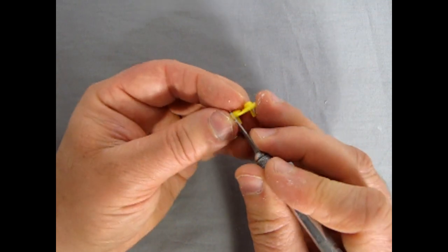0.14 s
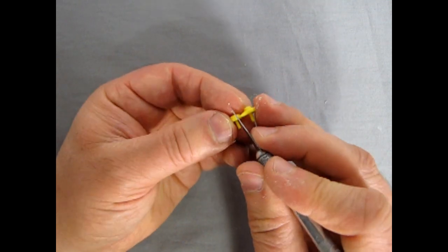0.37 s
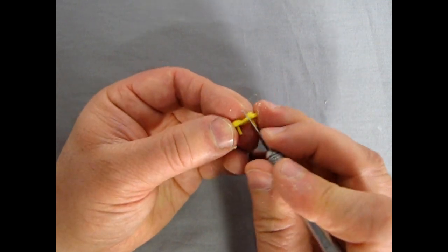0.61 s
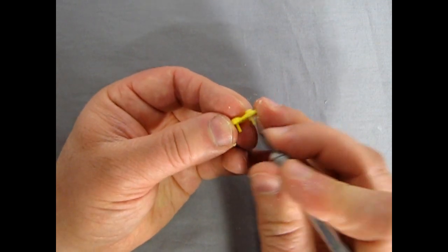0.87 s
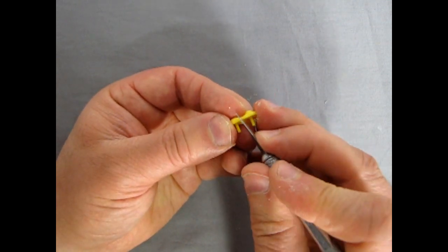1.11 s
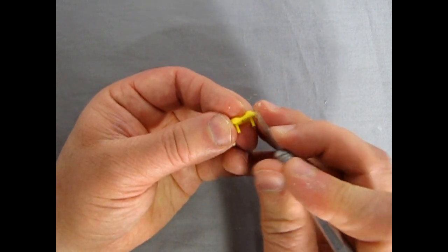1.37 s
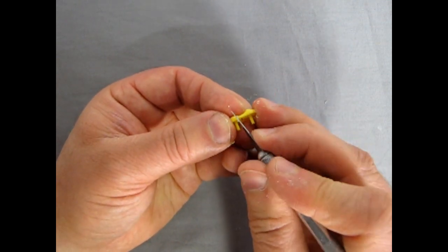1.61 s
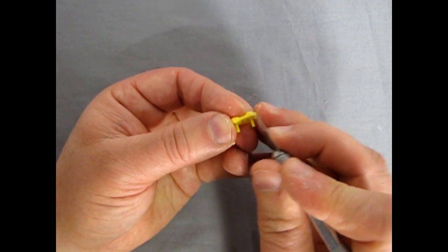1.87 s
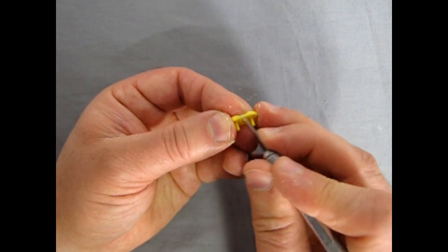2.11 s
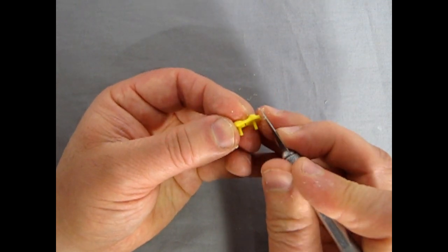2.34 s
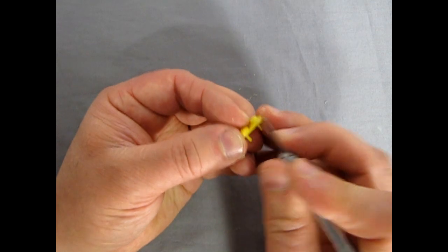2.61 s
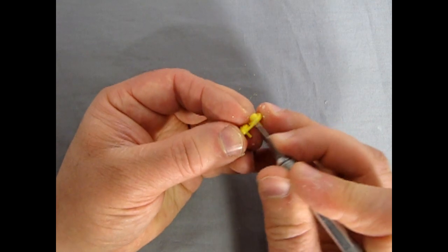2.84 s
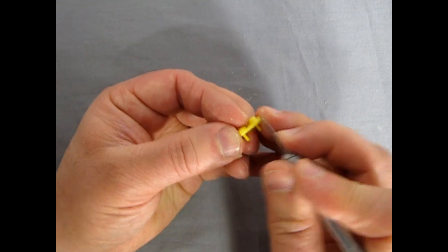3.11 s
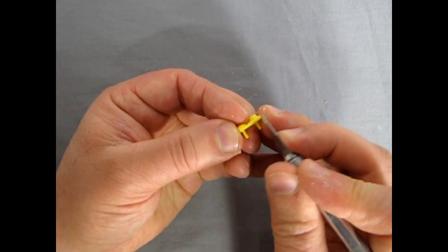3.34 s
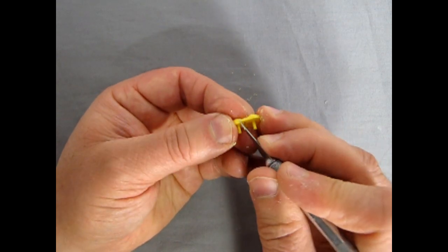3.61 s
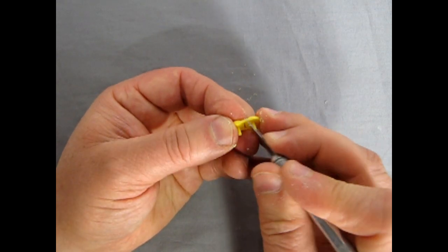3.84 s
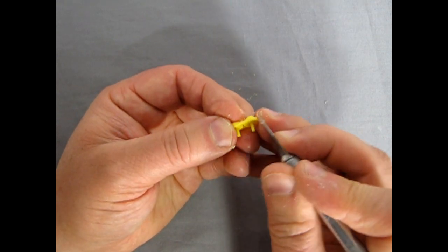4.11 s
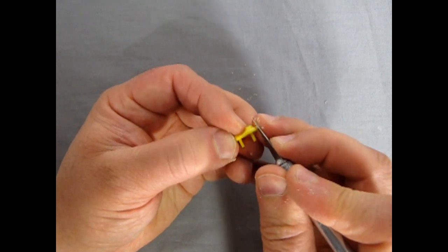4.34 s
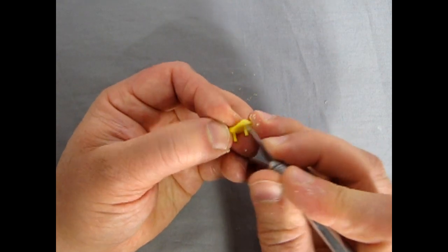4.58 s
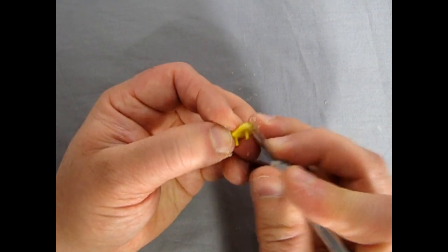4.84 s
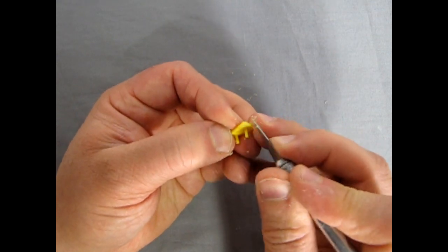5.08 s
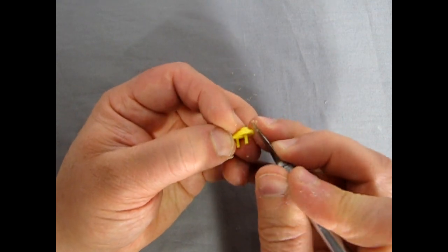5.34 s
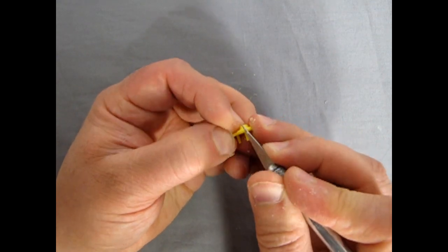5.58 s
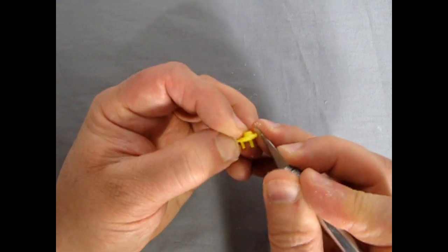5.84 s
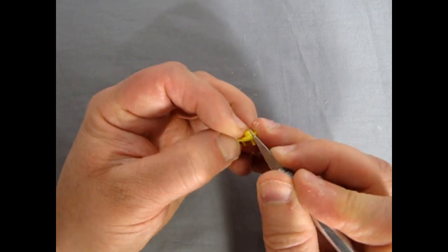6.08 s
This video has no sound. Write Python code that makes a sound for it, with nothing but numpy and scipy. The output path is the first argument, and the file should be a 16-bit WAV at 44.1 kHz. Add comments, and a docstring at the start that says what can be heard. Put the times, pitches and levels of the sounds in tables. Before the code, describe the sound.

A hobby knife shaves a tiny plastic part in short irregular ticking scrapes, one nick especially hard, amid light handling thumps and quiet room hiss.

```python
"""Over a faint room hum and a small motor's distant purr, fingers rustle and a wrist thumps the bench.
From 0.6 s a hobby knife shaves flash off a small plastic part in fifteen short strokes, heard close up.
Each stroke is a spray of tiny random slips with a few sharp nicks, ringing the modes of blade and part,
and the bench mirrors it about a millisecond late. Between and during strokes come more rustles and thumps.
A very hard pair of nicks opens the stroke at 4.93 s; the last stroke runs up to the end."""
import sys
import numpy as np
from scipy import signal
from scipy.fft import rfft, irfft, next_fast_len
from scipy.io import wavfile
from scipy.ndimage import uniform_filter1d

SR = 44100
rng = np.random.default_rng(int(sys.argv[2]) if len(sys.argv) > 2 else 0)


def put_to_file(sound):
    """Save the sound as 16-bit audio at rate SR, in the file named by the first command-line argument."""
    columns = np.atleast_2d(sound).T  # one column per channel
    safe = np.clip(columns, -1, 1)
    whole_steps = np.round(safe * 32767)
    wavfile.write(sys.argv[1], SR, whole_steps.astype(np.int16))


def nominal_scale(level):
    """Amplitude ratio for a level in decibels (scalar or array-like)."""
    x = np.asarray(level, float) / 20
    return 10 ** x


N = 273552

# Effort on the blade, one short curve a stroke. Each point: time in seconds, scraping drive in dB.
STROKES = [
    [(0.606, -56), (0.613, -43), (0.641, -37), (0.652, -45), (0.664, -44), (0.684, -49), (0.689, -62)],
    [(0.725, -37), (0.742, -34), (0.747, -46), (0.768, -62)],
    [(1.204, -41), (1.222, -39), (1.243, -43), (1.27, -39.5), (1.28, -60)],
    [(1.723, -37), (1.731, -45), (1.741, -35), (1.781, -41), (1.787, -58)],
    [(2.048, -56), (2.056, -50), (2.068, -68)],
    [(2.18, -51), (2.199, -53), (2.203, -38), (2.215, -50), (2.25, -50), (2.275, -44), (2.28, -60)],
    [(2.67, -55), (2.683, -53), (2.692, -35), (2.701, -40), (2.707, -57)],
    [(3.14, -48), (3.156, -48), (3.166, -34.5), (3.183, -31.5), (3.194, -43), (3.21, -56)],
    [(3.829, -41), (3.842, -47), (3.853, -35), (3.861, -42), (3.874, -42), (3.895, -52), (3.9, -62)],
    [(3.932, -45), (3.939, -42), (3.946, -33), (3.962, -36), (3.972, -27.5), (3.982, -44), (3.995, -59)],
    [(4.368, -55), (4.401, -46), (4.412, -55), (4.437, -60)],
    [(4.93, -27), (4.937, -25), (4.943, -37), (4.948, -51), (4.978, -62)],
    [(5.309, -55), (5.323, -42), (5.336, -37), (5.342, -58)],
    [(5.724, -49), (5.736, -46), (5.752, -38), (5.758, -54), (5.772, -62)],
    [(6.177, -49), (6.188, -53), (6.2, -42)],
]
# How each stroke is held. Each row: brightness in dB per octave, low ring, blade ring and part ring in dB.
GRIPS = [(-3.5, 1, -2, 5), (5, 9, -3, 1), (2, 7, 0, -0.5), (3, 5, -1, 0), (-6, -2, -2, 0), (3, 5, -2.5, 1),
         (5, 6, -1, 1), (8, 1, 0, 1.5), (0, 1.5, 0, -1), (6.5, 3.5, 1, -1), (6, 5, -4, 2),
         (6.5, 2.5, -2.5, 1.5), (7.5, 6, -5, 2.5), (4, 5, -4, 2), (-1, 2, -2, 3)]


def amp_pair(db, pan_db):
    """Gains for left and right; pan_db is left against right."""
    return nominal_scale(db + np.multiply.outer([.5, -.5], pan_db))


def evened(x):
    """Scales to rms 1."""
    return x / np.sqrt(np.mean(x ** 2) + 1e-20)


def read(points, hz):
    """Reads a curve over frequency, straight between points on a log-frequency axis."""
    f, value = np.transpose(points)
    return np.interp(np.log(hz + 1), np.log(f + 1), value)


def resonate(x, hz, width_hz):
    """A two-pole resonance of gain 1 at its peak."""
    return signal.lfilter(*signal.iirpeak(hz, hz / width_hz, SR), x)


def delayed(x, ms):
    """Delays by any fraction of a sample: one value, or a table over frequency."""
    size = next_fast_len(N + 512)
    hz = np.fft.rfftfreq(size, 1 / SR)
    ms = read(ms, hz) if np.ndim(ms) else ms
    turned = rfft(x, size) * np.exp(-2j * np.pi * hz * ms / 1000)
    return irfft(turned, size)[..., :N]


def noise(spectrum, patchy_db, size):
    """Stereo noise of rms 1 from random short-time spectra with drifting louder and softer patches."""
    # Left-right likeness. Each row: frequency in Hz, likeness from 0 to 1.
    likeness = [(30, 0.7), (100, 0.75), (300, 0.64), (1000, 0.29), (3000, 0.27), (8000, 0.04)]
    # Stereo balance. Each row: frequency in Hz, left against right in dB.
    lean = [(30, -9), (100, -1), (400, -1.5), (8000, -0.5)]
    frames, hz = N // (size // 4) + 5, np.fft.rfftfreq(size, 1 / SR)
    a, b, c, d, patches = rng.standard_normal((frames, len(hz), 5)).T
    patches = uniform_filter1d(patches, size=10, axis=0)
    patches = evened(uniform_filter1d(patches, size=10, axis=1))
    same = np.clip(read(likeness, hz), -1, 1)[:, None]
    left, other = a + 1j * b, c + 1j * d
    z = np.array([left, same * left + np.sqrt(1 - same ** 2) * other])
    z *= amp_pair(read(spectrum, hz), read(lean, hz))[:, :, None]
    z *= nominal_scale(patchy_db * patches)
    return evened(signal.istft(z, nperseg=size, noverlap=size - size // 4)[1][:, :N])


def knife():
    """Slips under each stroke and single nicks ring the same body; grip and effort shade its modes."""
    gain, shading = strokes()
    chatter_db = 1.2 * evened(resonate(rng.standard_normal(N), 260, 160))  # the edge judders along the seam
    scrape = gain * nominal_scale(chatter_db) * slips(5000, 2.4)
    drive = scrape + nicks(shading)
    # Fine shavings scatter as a high fizz
    fizz_gain = gain * nominal_scale(shading[0] + chatter_db - 22)
    fizz = fizz_gain * resonate(rng.standard_normal((2, N)), 12000, 7000)
    return blade_and_part(drive, shading) + fizz


def strokes():
    """Scraping gain over time, and how effort, grip and the sinking edge colour the ring."""
    bright_db_per_db, low_db_per_db = 0.4, -0.3  # more effort is brighter; a light touch keeps more low ring
    sink_db, sharpen_db = 4, 5  # low ring and brightness grow over a stroke as the edge sinks in
    t, gain = np.arange(N) / SR, np.zeros(N)
    shading = np.zeros((4, N))
    bright_db, low_db, blade_db, part_db = shading
    for rows, (bright, low, blade, part) in zip(STROKES, GRIPS):
        s, db = np.transpose(rows)
        on = slice(round(s[0] * SR) - SR // 50, round(s[-1] * SR))  # the colour is set 20 ms ahead
        effort_db = np.interp(t[on], s, db)
        gain[on] = nominal_scale(effort_db) * (t[on] > s[0])
        below_peak_db = effort_db - db.max()
        sink = np.interp(t[on], s[[0, -1]], [-.5, .5])
        bright_db[on] = bright + bright_db_per_db * below_peak_db + sharpen_db * sink
        low_db[on] = low + low_db_per_db * below_peak_db + sink_db * sink
        blade_db[on], part_db[on] = blade, part
    return gain, shading


def slips(per_s, spread_db):
    """Random stick-slip clicks, a few of them large, at rms 1."""
    size = nominal_scale(spread_db * np.minimum(rng.exponential(1, N), 4)) * rng.standard_normal(N)
    return evened(size * (rng.random(N) < per_s / SR))


def nicks(shading):
    """The blade catches and snaps free: a click, then splinters for 3 ms; each sets its own colour."""
    # Each row: time in seconds, drive in dB, brightness in dB per octave.
    snaps = [(0.608, -42, 0), (0.6143, -32, 0.5), (0.6265, -31, -4), (0.64, -28, -2), (0.6452, -31, -1.5),
             (0.6713, -36, -6), (0.6816, -33, -4), (0.7252, -23.5, 2), (0.7415, -24.5, 9), (1.2042, -31, 2),
             (1.2133, -33, -2), (1.2242, -33, -4), (1.7219, -20, 2), (1.7368, -31, 0), (1.7427, -28, -1),
             (1.7575, -31, 5), (1.798, -46, -3), (2.05, -43, -10), (2.054, -44, -8), (2.1805, -39, 2),
             (2.2005, -31, 0), (2.2443, -39, -1), (2.272, -39, 7), (2.6929, -29, 2), (3.1406, -39, 0),
             (3.1752, -28, 7), (3.182, -29, 9), (3.8296, -31, 0), (3.834, -32, 0), (3.8385, -33, -4),
             (3.8477, -26, 5), (3.853, -20.5, 4), (3.884, -36.5, 5), (3.9335, -30, 4), (3.9441, -26, 2),
             (3.9685, -21, 2), (4.1985, -48, -10), (4.294, -50, -4), (4.3373, -41.5, 3), (4.3926, -39, -2),
             (4.9297, -16.5, 6), (4.9338, -19, 7), (5.0069, -47.5, -8), (5.3292, -31, 1.5),
             (5.3352, -29, -2), (5.7267, -40.5, 6), (5.7495, -30, 0), (6.1784, -35, -2)]
    low_offset_db, scatter_db = -5, 2  # low ring against its stroke's grip, and its chance spread
    out = np.zeros(N)
    low_scatter_db = scatter_db * rng.standard_normal(len(snaps))
    crack = rng.standard_normal((len(snaps), 128))
    crack[:, 0] = 2.6  # the snap itself
    fade = nominal_scale(-60 * np.arange(128) / SR / .011)
    crack *= fade
    crack *= np.linalg.norm(fade) / np.linalg.norm(crack, axis=1, keepdims=True)
    # A nick takes the grip of its stroke up to 0.1 s after the stroke ends, then that of the next
    grip_at = np.searchsorted([rows[-1][0] + .1 for rows in STROKES], [row[0] for row in snaps])
    for (s, db, bright), burst, scatter, k in zip(snaps, crack, low_scatter_db, grip_at):
        on = slice(round(s * SR), round(s * SR) + 128)
        out[on] += nominal_scale(db) * burst
        shading[0, on] = bright
        shading[1, on] = GRIPS[k][1] + low_offset_db + scatter
    return out


def blade_and_part(drive, shading):
    """The ringing modes of blade and part, each driven by the cut with its own moving gain."""
    # Each row: frequency in Hz, width in Hz, level in dB, left against right in dB.
    modes = [(239.4, 36, -19, 0.5), (434, 30, -25.5, -2), (855, 126, -20, -3), (1028, 240, -12.5, -1.5),
             (1384, 73, -4, -2.5), (1945, 113, -12, -2.5), (2237, 67, -11, -7.5), (2600, 1650, -21.5, -6.5),
             (2734, 410, -12, -9), (3416, 390, -13.5, -4.5), (4103, 665, -3.5, -1), (4390, 510, -0.5, 1),
             (4700, 206, 3.5, -1.5), (5010, 265, -4.5, -0.5), (5590, 166, -9.5, -11), (6406, 350, -9, 3),
             (7500, 410, -12, -6), (8635, 194, -10, -4.5), (9400, 480, -13.5, 2.5),
             (11500, 4500, -25.5, -4), (14500, 830, -27.5, -2.5)]
    bright_db, low_db, blade_db, part_db = shading
    out, power = 0, 0
    for k, (hz, width_hz, db, pan) in enumerate(modes):
        if hz <= 700:
            tilt_db = 4  # the cut pushes a dull thud into the hand
        else:
            if hz > 4500:
                tilt_db = bright_db * min(np.log2(hz / 4500), 1.25)
            else:
                tilt_db = low_db * min(np.log2(4500 / hz) / 2, 1)  # in full from two octaves down
            tilt_db = tilt_db + blade_db * (4200 < hz < 5200) + part_db * (1700 < hz < 3300)
        ring = resonate(drive * nominal_scale(tilt_db), hz, width_hz)
        out += (-1) ** k * amp_pair(db, pan)[:, None] * ring  # neighbours in opposite polarity
        power += nominal_scale(db) ** 2 * width_hz * np.pi / SR
    return out / np.sqrt(power)


def room(x, t60=0.069):
    """A short scattered tail (t60 in s), other taps for each side."""
    t = np.arange(SR // 4) / SR
    tail = rng.standard_normal((2, len(t))) * nominal_scale(-60 * t / t60) * (t > .0015)
    return signal.fftconvolve(x, tail / np.linalg.norm(tail[0]), axes=1)[:, :N]


def thumps():
    """Hands knock the bench: a low ring swells in a few ms and dies fast, with a duller knock of wood on top."""
    # Each row: start in seconds, level in dB, pitch in Hz, 60 dB decay in seconds (20 ms at least).
    knocks = [(0.33, -55, 68.6, 0.16), (0.638, -56, 148, 0.093), (0.8, -55, 60, 0.25),
              (1.749, -52.5, 67.3, 0.09), (1.844, -48, 52.3, 0.078), (2.053, -43.5, 70.0, 0.034),
              (2.277, -39.5, 69.6, 0.13), (2.702, -42, 59.2, 0.13), (3.015, -50.5, 58, 0.2),
              (3.162, -53, 220, 0.07), (3.168, -42, 74.4, 0.047), (3.87, -51.5, 92, 0.26),
              (3.958, -41.5, 54.4, 0.088), (4.943, -46, 126, 0.091), (4.945, -50, 250, 0.07),
              (4.97, -53, 54.4, 0.15), (5.4, -54, 55, 0.25), (5.745, -50, 260, 0.08),
              (5.749, -50, 75, 0.15), (6.119, -54, 67.3, 0.1), (6.178, -52, 240, 0.08)]
    knock_db, knock_db_per_octave = -16, 8  # wood against the low ring at 65 Hz; higher thumps knock more
    t, out = np.arange(SR // 2) / SR, np.zeros(N + SR)
    wood = resonate(rng.standard_normal((len(knocks), len(t))), 175, 158)
    for (s, db, hz, t60), grain in zip(knocks, wood):
        swell = nominal_scale(-60 * t / max(t60, .02)) * (1 - np.exp(-t / 0.0048))
        wood_gain = nominal_scale(knock_db + knock_db_per_octave * np.log2(hz / 65))
        ring = np.sin(2 * np.pi * hz * t) + wood_gain * evened(grain)
        out[round(s * SR):][:len(t)] += nominal_scale(db) * swell / swell.max() * ring
    return amp_pair(0, -4.5)[:, None] * out[:N]


def rustle():
    """Soft skin friction: each shift of the fingers and each slide after a stroke swells and fades."""
    # Colour of the friction. Each row: frequency in Hz, density in dB per Hz.
    rub = [(150, -28), (310, 2.5), (420, -6.5), (600, -10.5), (1700, -2.5), (2300, -7), (2900, 0.5),
           (3600, -4.5), (5000, -6), (7000, -10), (9000, -18), (16000, -29)]
    # Fingers shift their hold. Each row: loudest at in seconds, level in dB, rise and fall in seconds per 20 dB.
    shifts = [(0.001, -59, 0.1, 0.2), (0.15, -59, 0.08, 0.3), (0.25, -56, 0.3, 0.4),
              (0.36, -61.5, 0.3, 0.4), (0.55, -67, 0.3, 0.4), (1.0, -67, 0.3, 0.05), (1.31, -64, 0.1, 0.05),
              (1.81, -66, 0.1, 0.1), (3.23, -64, 0.1, 0.06), (4.425, -63, 0.3, 0.05),
              (1.51, -69, 0.2, 0.08), (2.03, -74, 0.2, 0.15), (2.49, -71, 0.1, 0.3),
              (2.66, -66, 0.07, 0.15), (2.92, -72, 0.25, 0.08), (3.5, -70, 0.1, 0.04),
              (4.2, -64, 0.04, 0.03), (4.65, -73, 0.15, 0.15), (4.86, -71, 0.2, 0.2),
              (5.22, -70, 0.3, 0.07), (5.02, -65, 0.2, 0.08), (5.59, -65, 0.08, 0.2), (5.71, -66, 0.2, 0.3),
              (5.85, -68, 0.2, 0.05), (5.96, -68, 0.06, 0.6), (6.16, -63, 0.1, 0.2)]
    # The thumb slides on, loudest 15 ms after each stroke
    slides = [(rows[-1][0] + 0.015, -65, 0.15, 0.07) for rows in STROKES]
    t, power = np.arange(N) / SR, nominal_scale(-84) ** 2  # hands at rest
    for s, db, rise, fall in shifts + slides:
        power = power + nominal_scale(db - 20 * np.maximum((s - t) / rise, (t - s) / fall)) ** 2
    return np.sqrt(power) * noise(rub, 2.55, size=256)


def motor():
    """A small distant motor: uneven soft pulses, each ringing one part of its housing for a few ms."""
    # One row: typical pulses per second, list of housing modes in Hz, their width in Hz, level in dB.
    purr = (60, [1197, 1233, 1268, 1357], 135, -69.5)
    per_s, housing, width_hz, db = purr
    wander_db = 3.5 * evened(uniform_filter1d(rng.standard_normal(N), size=1500))
    turns = np.cumsum(per_s / SR * nominal_scale(wander_db))
    pulses = np.diff(np.floor(turns), prepend=0) * rng.uniform(0.16, 2.5, N)
    part = rng.integers(0, len(housing), N)
    blips = 0
    for k, hz in enumerate(housing):
        blips = blips + resonate(resonate(pulses * (part == k), hz, width_hz), hz, width_hz)
    return nominal_scale(db) * evened(np.array([blips, delayed(blips, 0.14)]))  # right side later


def room_tone():
    """Steady hiss, narrow bands of fan-like whirr, and a low rumble that sways and drifts."""
    # Hiss. Each row: frequency in Hz, density in dB per Hz.
    air = [(120, -29), (200, -4), (400, -6), (900, -8.5), (1300, -9.5), (1700, -13), (2600, -14.5),
           (4800, -16.5), (10500, -22.5), (14900, -27.5), (16000, -44)]
    hiss = nominal_scale(-65) * noise(air, 0.47, size=2048)
    return hiss + whirr() + rumble()


def whirr():
    """Noise through doubled narrow resonances, with some of each side crossing to the other."""
    # Each row: frequency in Hz, width in Hz, level in dB before the crossing.
    fan = [(412.6, 51, -77.5), (253.3, 36, -77)]
    bands = 0
    for hz, width_hz, db in fan:
        hum = resonate(rng.standard_normal((2, N)), hz, width_hz)
        bands = bands + nominal_scale(db) * evened(resonate(hum, hz, width_hz))
    return bands + 0.21 * bands[::-1]


def rumble():
    """Low noise that swells as the arms move, at the outset and around each stroke's end, and drifts."""
    # Each row: frequency in Hz, density in dB per Hz.
    low = [(15, -24.5), (24, -2), (32, -8.5), (50, 1.5), (100, -6), (200, -10.5), (350, -24.5),
           (600, -30.5), (20000, -97)]
    rest_db, sway_db, sway_s, drift_db = -64.5, 7, 0.25, 0.6
    t = np.arange(N) / SR
    moves = [0] + [rows[-1][0] for rows in STROKES]
    sway = np.max([np.exp(-abs(t - s) / sway_s) for s in moves], axis=0)
    drift = uniform_filter1d(rng.standard_normal(N), size=9000)
    drift = evened(uniform_filter1d(drift, size=9000))
    return nominal_scale(rest_db + sway_db * sway + drift_db * drift) * noise(low, 1.4, size=2048)


def scene():
    """The bench mirrors the knife about a millisecond late; the left microphone is a little further off."""
    # Knife, left after right. Each row: frequency in Hz, lag in ms.
    lag = [(1000, .01), (1900, 0.13), (2600, 0.021), (3300, 0.047), (4200, 0.021), (6900, 0.049),
           (8400, 0.027), (11000, 0.039), (15000, 0.019)]
    work = knife()
    left = delayed(work[0], lag) + nominal_scale(-12.5) * delayed(work[0], 1.08)
    right = work[1] + nominal_scale(-12.5) * delayed(work[1], 0.97)
    work = np.array([left, right])
    return work + nominal_scale(-17.5) * room(work) + thumps() + rustle() + motor() + room_tone()


def top_cut(x):
    """Nothing passes above the cut-off."""
    return signal.sosfilt(signal.butter(12, 16850, fs=SR, output="sos"), x)


def record(dry):
    """The finished mix as a small camera keeps it."""
    return top_cut(dry)


dry = scene()
out = record(dry)
put_to_file(out)
```